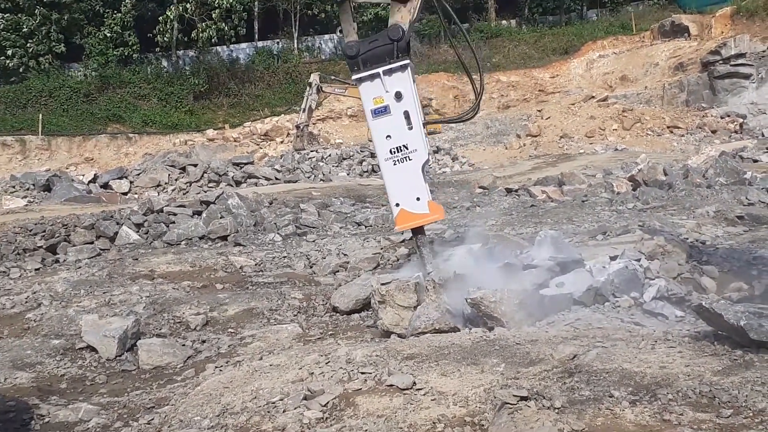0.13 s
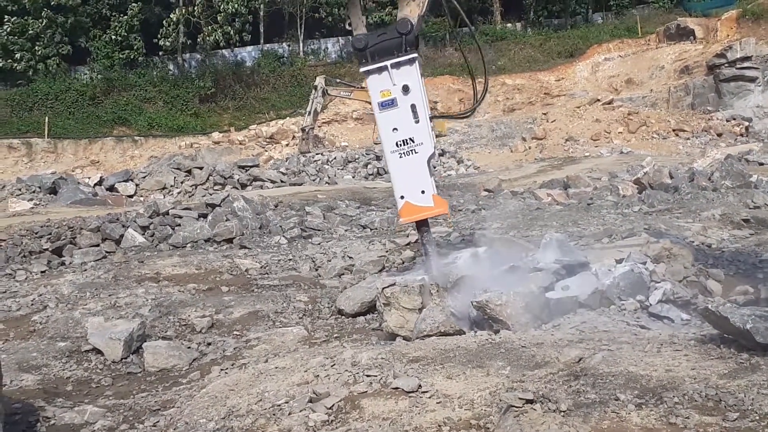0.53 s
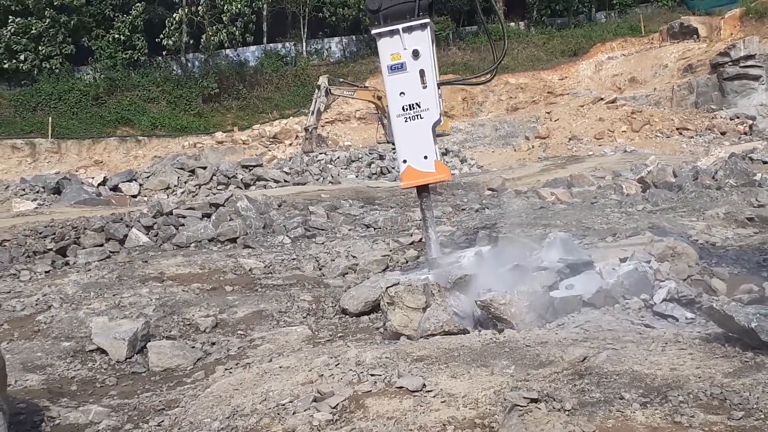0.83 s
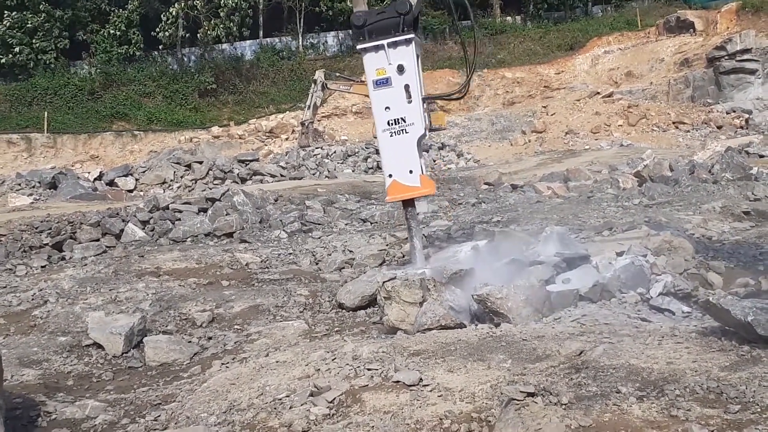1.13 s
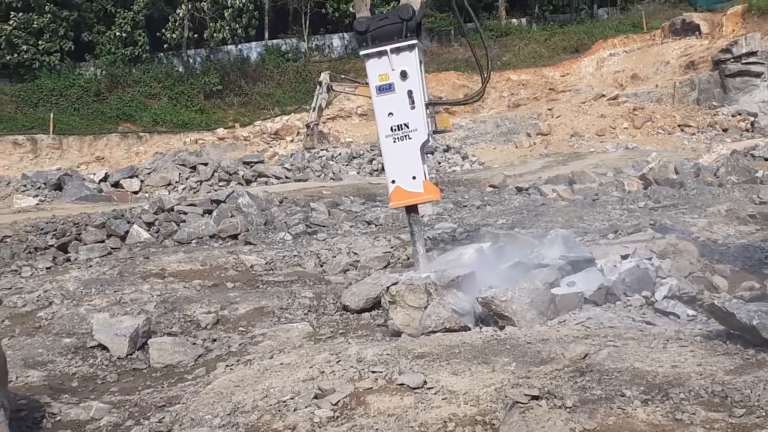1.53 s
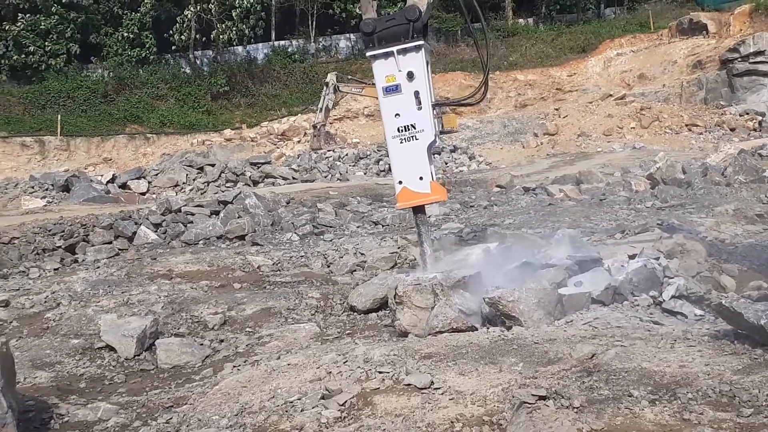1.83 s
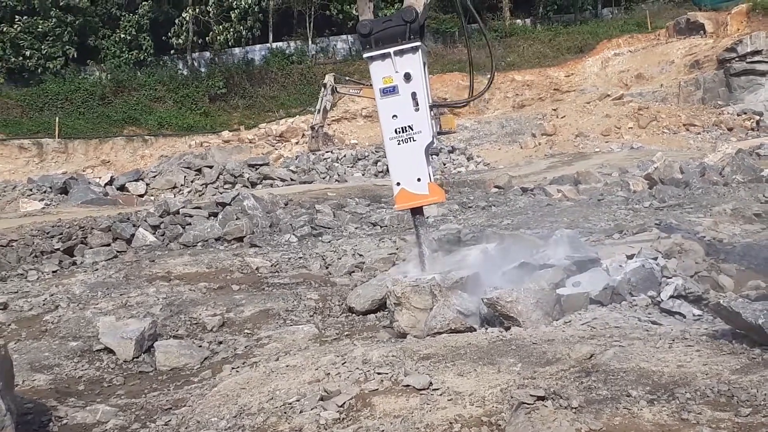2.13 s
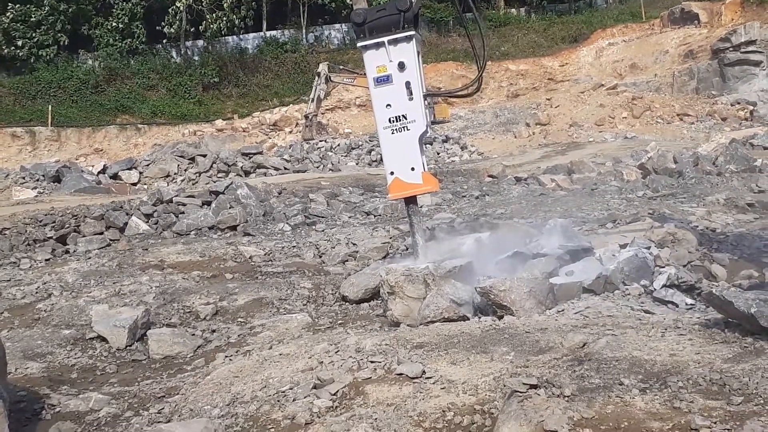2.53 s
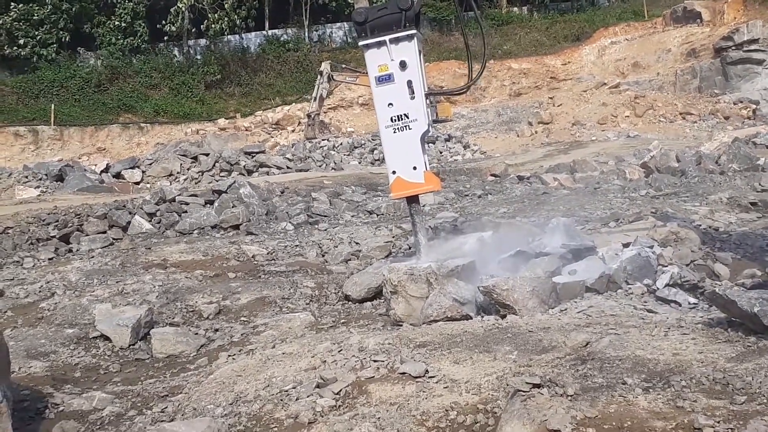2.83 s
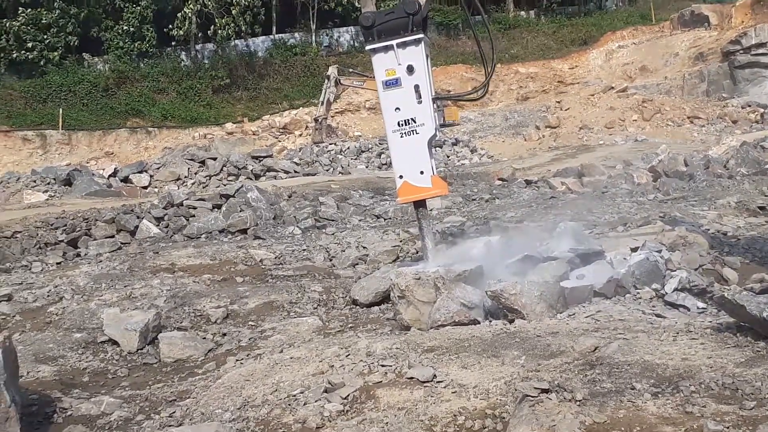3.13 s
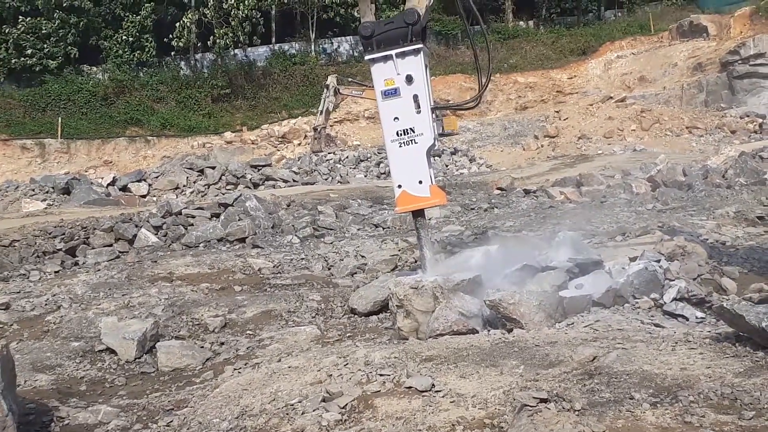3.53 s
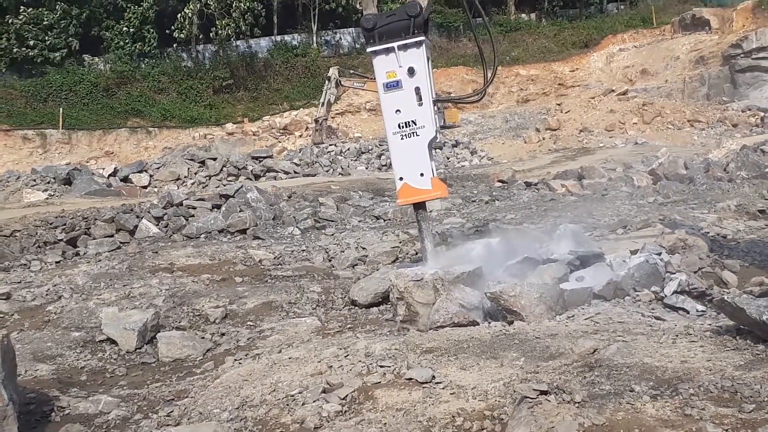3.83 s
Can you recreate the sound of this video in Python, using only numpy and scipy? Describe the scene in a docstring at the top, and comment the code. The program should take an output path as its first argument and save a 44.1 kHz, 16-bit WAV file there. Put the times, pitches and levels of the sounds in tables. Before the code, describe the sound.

Loud steel-on-rock hammering by a hydraulic breaker outdoors, first three spaced clanging blows, then rubble shifting and faint hisses, then about seven or eight hard blows a second, over a quiet low engine, heard in fairly narrow stereo.

```python
"""A hydraulic breaker hammers rock in an open quarry, heard on a stereo microphone: three loose blows,
a pause while the chisel is set down again, then about 7.5 blows a second. Shaped noise makes the crash, the crack,
the loose rock, the valve's spit and the oil's hiss; decaying modes make the ring of chisel and housing.
A low echo follows after 54 ms, as from a face some nine metres off, with a dull scatter from the rubble.
Underneath, the excavator's diesel drones: wavering sines over a noise rumble."""
import sys
import numpy as np
from scipy import signal
from scipy.fft import rfft, irfft
from scipy.io import wavfile

SR = 44100
rng = np.random.default_rng(int(sys.argv[2]) if len(sys.argv) > 2 else 0)


def generate_wav(signal):
    """Clip the signal to [-1, 1] and save it as 16-bit WAV at the path in sys.argv[1]."""
    frames = np.transpose(np.atleast_2d(signal))
    scaled = np.clip(frames, -1, 1) * 32767
    pcm = np.round(scaled).astype(np.int16)
    wavfile.write(sys.argv[1], SR, pcm)


N = 176400
T = np.arange(int(.9 * SR)) / SR  # time axis of one event, in seconds

# Stereo image at the microphone. Each row: pitch in Hz, side minus mid in dB, left minus right in dB.
STEREO_IMAGE = [(100, -24, -1.5), (423, -22.5, -0.5), (800, -12, -0.5), (1400, -10, -.4),
                (2860, -8.5, -2.5), (5400, -10, -3), (9300, -6.5, -1.5), (14000, -8.5, 3.5)]

# Colour of the diesel's rumble. Each row: pitch in Hz, relative level in dB per Hz.
RUMBLE_COLOUR = [(25, -41), (50, -15), (80, -12), (120, -5.5), (165, 2.5), (240, -1.5), (380, -10.5),
                 (600, -9.5), (850, -16.5), (2000, -26.5), (5000, -28), (10500, -38.5), (15000, -44)]
# Engine orders, before their waver. Each row: pitch in Hz, rms level in dB.
ENGINE_ORDERS = [(82, -46), (122, -50.5), (164, -43), (243, -47)]
RUMBLE_DB, ORDER_WAVER_DB = -39, 3

# Piston blows. Each row: start in seconds, then crash, boom, treble, crack, clang, overtone and bending ring
# levels in dB (added to the levels below), ring length as a factor, crash hold in seconds.
BLOWS = [(0.002, -6.5, -15, 1.5, 0, 11, 5.5, -16, 1.8, 0.046),
         (0.212, -2.5, -16.5, -1, -3, 4, -2, -14, 3.6, 0.027),
         (0.405, -6, -15, -5.5, 0.5, -18, -12.5, -22, 2.04, 0.06),
         (1.555, -2, -6, 0.5, -1, 13, 6, -16, 0.96, 0.026),
         (1.6909, -1, -6.5, 1.5, 1, 0, 2.5, -14.5, 1.23, 0.0093),
         (1.823, -2.5, -4, 3, -5, -1.5, -1.5, -8, 1.45, 0.011),
         (1.9558, -3, -4, 2.5, -18, -3.5, 3.5, -12.5, 1.55, 0.028),
         (2.09, -2.5, -5.5, 3.5, -21, -3, 2.5, -11, 1.85, 0.031),
         (2.224, -2, -5, 3.5, -17, -6, 2, -3.5, 1.6, 0.046),
         (2.359, 0.5, -5, -0.5, -13, -1, 6.5, -7.5, 1.53, 0.017),
         (2.489, -1, -3.5, 0, -8, -10, 5, -5.5, 1.38, 0.025),
         (2.62, -1.5, -5.5, -1, -12, -2, 9, -7.5, 1.07, 0.0085),
         (2.753, -1.5, -5, 1, -0.5, -6, 10, -12, 0.89, 0.01),
         (2.888, 0, -3, -1.5, 3, -16, 3.5, -2.5, 0.74, 0.015),
         (3.023, -0.5, -4.5, 0.5, 8, -4, 5, -9, 1.07, 0.016),
         (3.158, 0, -4, 0.5, 6.5, -18, 5.5, -5.5, 0.86, 0.016),
         (3.2886, -1, -4, 1, 7.5, -10, 6, -6, 1.07, 0.025),
         (3.422, 0, -4, 0.5, -15, -9, 6, -5.5, 1.2, 0.018),
         (3.5535, -2.5, -7.5, 3.5, -14, -17, 3.5, -5, 1.34, 0.031),
         (3.6873, -0.5, -6, 1.5, 5.5, -2, 4.5, -3, 1.24, 0.022),
         (3.8231, -1.5, -8, 2, 4, -1.5, -2, -6, 1.5, 0.016),
         (3.967, 1, -3.5, -2.5, 1, -5, -1, -6, 1.06, 0.018)]

# Colour of the crash of steel on rock. Each row: pitch in Hz, relative level in dB per Hz.
CRASH_COLOUR = [(30, -46), (60, -16), (125, -12.5), (250, 8), (420, 0.5), (570, 4.5), (760, -4), (1080, -2),
                (1340, -14), (1650, -5), (2200, -7), (2650, -8.5), (3600, -12), (4400, -3), (5000, -10.5),
                (5600, -10), (6100, -12), (6850, -4), (7500, -18.5), (9500, -18.5), (12000, -23),
                (15500, -36)]
# Decay of the crash by band. Each row: band centre in Hz, t60 in seconds.
CRASH_DECAY = [(100, 0.36), (300, 0.18), (1000, 0.17), (2500, .17), (6000, 0.15), (14000, 0.34)]
CRASH_DB = -14
REPEAT_SHARE = 0.39  # share of the crash's power that is the same noise at every blow
SNAP_DB, SNAP_T60_S = 0, 0.09
TAIL_DB, TAIL_T60_S = -5.5, 0.46
BASS_LAG_CYCLES = 0.38  # rise time of each band, in cycles of its centre
PATCHY_DB, PATCH_WIDTH_HZ, PATCHY_FROM_HZ = 4, 70, 2000
TOP_HZ = 15700  # upper limit of the recorder

# Colour of the crack, the loose rock and one hiss among it.
# Each row: pitch in Hz, relative level in dB per Hz.
ROCK_COLOUR = [(30, -36), (140, 9), (400, 3.5), (560, 10), (800, 1), (1400, -1), (2200, -6), (3300, -8),
               (5000, -8), (8000, -16), (15000, -31)]
CRACK_HZ, CRACK_WIDTH, CRACK_DB = 1098, 0.053, -24.5  # width is a share of the pitch
CRACK_HOLD_S, CRACK_T60_S = 0.0086, 0.098

# Lengthwise fundamental of the chisel, a close pair.
# Each row: pitch in Hz, level in dB, t60 in seconds before the blow's ring length factor.
CLANG_MODES = [(2214, -23.5, 0.18), (2230, -24, 0.11)]
# Lengthwise overtones of the chisel. Each entry: pitch in Hz.
OVERTONE_HZ = [4316, 4345, 6411, 6420, 8591, 9477, 10772, 10806, 12752, 12764, 14567]
# The same overtones. Each row: level in dB before tilt, t60 in seconds before the ring length factor.
OVERTONE_RING = [(-31, 0.17), (-23.5, 0.17), (-31.5, 0.19), (-34, 0.54), (-33, 0.29), (-34.5, 0.24),
                 (-30, 0.21), (-34, 0.34), (-33, 0.18), (-43, 0.47), (-37.5, 0.23)]
# Bending modes of the chisel. Each entry: pitch in Hz.
BENDING_HZ = [1926, 2992, 3180, 4193, 4555, 4730, 5270, 5448, 5560, 6760, 6908, 8087, 12200, 13324, 13512]
# The same bending modes. Each row: level in dB, t60 in seconds before the ring length factor.
BENDING_RING = [(-17.5, 0.13), (-12, 0.06), (-22, 0.22), (-11, 0.14), (-27, 0.29), (-26.5, 0.41),
                (-14, 0.17), (-13, 0.15), (-15, 0.13), (-26.5, 0.16), (-33.5, 0.68), (-22.5, 0.22),
                (-35, 0.75), (-35, 0.23), (-38, 0.17)]
# Tilt of the overtones, darker on loose rock. Each row: time in seconds, tilt in dB per octave.
OVERTONE_TILT = [(0, -4.5), (.21, -3), (.41, -7), (1.555, 2.5), (1.69, -5), (2.2, -3), (2.75, -0.5),
                 (3.3, 0.5), (3.97, 4)]
RING_RISE_S, CHOKE_T60_S = 0.0021, 0.15
RING_SCATTER_DB = 2
OVERTONE_DETUNE, BENDING_DETUNE = .0007, .0025  # random spread as a share of the pitch

# Modes of the breaker's housing. Each row: pitch in Hz, level in dB, t60 in seconds.
HOUSING_MODES = [(150, -20, 0.4), (244.6, -14.5, 0.23), (515.5, -18, 0.14), (641, -23, 0.2),
                 (970, -34, 0.055), (1056, -30, 0.097), (1134, -12, 0.062)]
BOOM_RISE_S, BOOM_SCATTER_DB, BOOM_DETUNE = 0.0035, 1.5, .01

THUMP_HZ, THUMP_DB, THUMP_AT_S, THUMP_WIDTH_S = 123, -12.5, 0.01232, 0.0088

# Side plates of the housing. Each row: pitch in Hz, level in dB, t60 in seconds before PLATE_LENGTH.
PLATE_MODES = [(241.3, -3.5, 0.15), (349.2, 0, .17), (551, 5.5, 0.12)]
# Level of the plates' ring. Each row: time in seconds, level in dB.
PLATE_LEVEL = [(0, -0.5), (.3, -4.5), (1.555, -2), (1.69, 2), (2.09, 0.5), (2.36, -5.5), (2.62, -1.5),
               (3.1, -1), (3.55, -2), (3.97, -8)]
PLATE_SWELL_S, PLATE_LENGTH = 0.034, 0.97

ECHO_S, ECHO_DB, ECHO_HZ = .054, -6.5, 207  # delay, level, low-pass corner
SCATTER_DB, SCATTER_T60_S, SCATTER_DULL_HZ = -17.5, 0.66, 4000

# Loose rock knocking and sliding, and one burst of oil hiss at 0.742 s. Each row: start in seconds,
# level in dB, treble in dB, hold in seconds, decay t60 in seconds, band centre in Hz, band boost or cut in dB.
KNOCKS_AND_HISS = [(0.066, -5.5, 5.5, 0.012, 0.33, 4700, 7), (0.405, -8, 8.5, 0.022, 0.13, 1640, 16),
                   (0.541, -26, 5, 0.0034, 0.072, 1720, 27), (0.623, -30.5, 8, 0.015, 0.33, 600, 3),
                   (0.644, -20.5, -33, 0.0074, 0.065, 1530, 17), (0.742, -34, 9.5, 0.014, 0.23, 1700, -3),
                   (1.080, -18.5, 0.5, 0.014, 0.27, 1020, 5.5), (1.127, -26, 1, 0.034, .25, 2270, 14),
                   (1.167, -29, 12, 0.0043, 0.079, 7400, 10), (1.202, -8, -4, .015, 0.17, 2150, 10),
                   (1.214, -6, -7.5, 0.023, 0.13, 800, 11.5), (1.223, -6.5, -7, 0.018, 0.12, 554, 15),
                   (1.263, -16, 2, 0.031, 0.18, 1090, 7), (1.322, -15, -2, 0.01, 0.086, 525, 9.5)]
BURST_DB, BURST_RISE_S, BURST_BAND_WIDTH = -12.5, 0.0023, 0.064

# Colour of the valve's spit and of the oil. Each row: pitch in Hz, relative level in dB per Hz.
VALVE_COLOUR = [(100, -54), (500, 6), (1500, -1), (3000, -3.5), (4800, 5.5), (7500, -7.5), (10500, 1),
                (13000, -8), (16000, -14.5)]
VALVE_LEAD_S, VALVE_DB = .0245, -23.5
VALVE_RISE_S, VALVE_HOLD_S, VALVE_T60_S = 0.0028, 0.0081, 0.063

# Oil hissing through the control valve in the pause.
# Each row: start in seconds, level in dB, decay t60 in seconds.
HISSES = [(0.742, -47.5, .35), (1.418, -49, 0.14)]
HISS_HZ, HISS_WIDTH, HISS_RISE_S = 12200, .2, 0.0052

CEILING = .95  # full-scale level that the recorder's peaks approach


def undb(db):
    """Decibels to an amplitude factor."""
    return 10 ** (np.asarray(db) / 20)


def at(hz, table, axis=1):
    """A column of a table, read on a log-frequency axis."""
    table = np.array(table, float)
    return np.interp(np.log(np.maximum(hz, 1)), np.log(table[:, 0]), table[:, axis])


def at_time(seconds, table):
    """The level column of a time table, read between its rows."""
    return np.interp(seconds, *np.transpose(table))


def bins(size):
    """Pitches in Hz of the spectrum of a sound."""
    return np.arange(size // 2 + 1) * SR / size


def add(out, start, sound):
    """Mix a sound in from a given time; one that would start before zero is left out."""
    i = int(start * SR)
    if 0 <= i < N:
        out[:, i:i + sound.shape[1]] += sound[:, :N - i]


def spread(hz, mid, side):
    """Left and right from mid and side, with width and balance set by pitch."""
    side = side * undb(at(hz, STEREO_IMAGE, axis=1))
    pan = undb(at(hz, STEREO_IMAGE, axis=2) / 2)
    return np.array([(mid + side) * pan, (mid - side) / pan])


def noise(colour, size):
    """Stereo noise of a given colour, rms 1."""
    mid, side = rfft(rng.standard_normal((2, size)))
    hz = bins(size)
    x = irfft(spread(hz, mid, side) * undb(at(hz, colour)), size)
    return x / x.std()


def lowpass(x, hz, order=2):
    """Butterworth low-pass."""
    return signal.sosfilt(signal.butter(order, min(hz, SR / 2 - 1), fs=SR, output="sos"), x)


def brighten(x, db, corner_hz=2200):
    """Treble shelf."""
    low = lowpass(x, corner_hz, order=1)
    return low + undb(db) * (x - low)


def resonate(x, hz, width):
    """One resonance; width is a share of its pitch."""
    return signal.lfilter(*signal.iirpeak(min(hz, SR * .45), 1 / width, fs=SR), x)


def rise(time_s):
    """Exponential onset with a given time constant."""
    return 1 - np.exp(-T / time_s)


def fade(hold, t60):
    """Hold, then an exponential decay of 60 dB in t60 seconds."""
    return 1000. ** (-np.maximum(T - hold, 0) / max(t60, 1e-3))


def ring(modes, rise_s, length, scatter_db, detune):
    """Modes struck once, each decaying; every strike shares its force among them a little differently."""
    out = 0
    chances = rng.standard_normal((len(modes), 4))
    for (hz, db, t60), (size, off, mid_turn, side_turn) in zip(modes, chances):
        turning = 2j * np.pi * hz * (1 + detune * off)
        damping = np.log(1000) / (t60 * length)
        wave = signal.lfilter([1], [1, -np.exp((turning - damping) / SR)], T == 0)
        ears = spread(hz, np.exp(1j * np.pi * mid_turn), np.exp(1j * np.pi * side_turn))
        out = out + (ears[:, None] * wave).imag * undb(db + scatter_db * size)
    return out * rise(rise_s)


def walk(count):
    """Slow random wander around 0 with count turning points in all; spread near 1."""
    return np.interp(np.linspace(0, count - 1, N), np.arange(count), rng.standard_normal(count))


def engine(wander=.008):
    """The diesel's orders share one wandering speed, each wavering in level, over the rumble."""
    seconds_run = np.cumsum(1 + wander * walk(count=30)) / SR
    hum = 0
    for hz, db in ENGINE_ORDERS:
        level = np.sqrt(2) * undb(db + ORDER_WAVER_DB * walk(count=60))  # root 2 turns rms to peak
        hum = hum + level * np.sin(2 * np.pi * (hz * seconds_run + rng.random()))
    return hum + undb(RUMBLE_DB) * noise(RUMBLE_COLOUR, N)


def patches(hz):
    """Every blow favours other resonances of the dense steel spectrum, less so in the bass."""
    grid = np.arange(0, SR / 2, PATCH_WIDTH_HZ)
    bumps = np.interp(hz, grid, rng.standard_normal(len(grid)))
    gain = undb(PATCHY_DB * bumps * np.minimum(hz / PATCHY_FROM_HZ, 1))
    return gain / gain[hz < TOP_HZ].mean()


def crash(same, treble_db, hold):
    """Steel on rock: dense noise, partly the same each time, rising and decaying band by band."""
    patchy = patches(bins(len(T)))
    fresh = noise(CRASH_COLOUR, len(T))
    mixed = np.sqrt(REPEAT_SHARE) * same + np.sqrt(1 - REPEAT_SHARE) * fresh
    dense = patchy * rfft(brighten(mixed, treble_db))
    snap_and_tail = np.hypot(undb(SNAP_DB) * fade(0, SNAP_T60_S), undb(TAIL_DB) * fade(0, TAIL_T60_S))
    centres = [hz for hz, _ in CRASH_DECAY]
    out = 0
    for (centre, t60), one in zip(CRASH_DECAY, np.eye(len(centres))):
        band = at(bins(len(T)), list(zip(centres, one)))  # overlapping bands that sum to 1
        envelope = rise(BASS_LAG_CYCLES / centre) * np.hypot(fade(hold, t60), snap_and_tail)
        out = out + irfft(dense * band, len(T)) * envelope
    return out


def crack():
    """The rock cracks: noise through one narrow resonance, held briefly, then decaying."""
    x = resonate(noise(ROCK_COLOUR, len(T)), CRACK_HZ, CRACK_WIDTH)
    return x / x.std() * fade(CRACK_HOLD_S, CRACK_T60_S)


def chisel(clang_db, overtone_db, bend_db, length, tilt_db):
    """The steel bar rings lengthwise and in bending, longer when it hangs loose."""
    middle_hz = np.median(OVERTONE_HZ)
    overtones = [(hz, db + tilt_db * np.log2(hz / middle_hz), t60)
                 for hz, (db, t60) in zip(OVERTONE_HZ, OVERTONE_RING)]
    bending = np.column_stack([BENDING_HZ, BENDING_RING])
    groups = [(CLANG_MODES, clang_db, OVERTONE_DETUNE),
              (overtones, overtone_db, OVERTONE_DETUNE),
              (bending, bend_db, BENDING_DETUNE)]
    return sum(undb(db) * ring(modes, RING_RISE_S, length, RING_SCATTER_DB, detune)
               for modes, db, detune in groups)


def housing():
    """The breaker's housing booms in its own modes, set off by the blow."""
    return ring(HOUSING_MODES, BOOM_RISE_S, 1, BOOM_SCATTER_DB, BOOM_DETUNE)


def breaker():
    """Each blow crashes on the rock, cracks it, rings the chisel and booms in the housing."""
    out = np.zeros((2, N))
    same = noise(CRASH_COLOUR, len(T))
    gaps = np.diff([row[0] for row in BLOWS], append=np.inf)
    for blow, gap in zip(BLOWS, gaps):
        start, crash_db, boom_db, treble_db, crack_db, clang_db, overtone_db, bend_db, length, hold = blow
        add(out, start, undb(CRASH_DB + crash_db) * crash(same, treble_db, hold))
        add(out, start, undb(CRACK_DB + crack_db) * crack())
        steel = chisel(clang_db, overtone_db, bend_db, length, at_time(start, OVERTONE_TILT))
        add(out, start, steel * fade(gap - VALVE_LEAD_S, CHOKE_T60_S))  # the next stroke damps the ring
        add(out, start, undb(boom_db) * housing())
    return out


def ground():
    """The ground thumps under each blow: a low sine in a short bell-shaped burst."""
    out = np.zeros((2, N))
    late = T - THUMP_AT_S
    thump = np.sin(2 * np.pi * THUMP_HZ * late) * np.exp(-(late / THUMP_WIDTH_S) ** 2)
    for start, _, boom_db, *_ in BLOWS:
        add(out, start, undb(THUMP_DB + boom_db) * np.array([thump, thump]))
    return out


def side_plates():
    """The housing's plates build up after each blow and die away as modes with a double onset."""
    out = np.zeros((2, N))
    for start, *_ in BLOWS:
        plates = ring(PLATE_MODES, PLATE_SWELL_S, PLATE_LENGTH, BOOM_SCATTER_DB, BOOM_DETUNE)
        add(out, start, undb(at_time(start, PLATE_LEVEL)) * plates * rise(PLATE_SWELL_S))
    return out


def quarry(x):
    """One low echo from the rock face and a dull scatter from the rubble, as a decaying noise response."""
    scatter = lowpass(rng.standard_normal((2, len(T))), SCATTER_DULL_HZ)
    mid, side = rfft(scatter * fade(0, SCATTER_T60_S) * rise(ECHO_S))
    scatter = irfft(spread(bins(len(T)), mid, side), len(T))
    scatter = scatter / np.sqrt(np.sum(scatter ** 2))
    out = undb(SCATTER_DB) * signal.fftconvolve(x, scatter, axes=1)[:, :N]
    add(out, ECHO_S, undb(ECHO_DB) * lowpass(x, ECHO_HZ))
    return out


def loose_rock_and_hiss():
    """Rock knocks and slides, and oil hisses once: noise bursts, each with one band boosted or cut."""
    out = np.zeros((2, N))
    for start, db, treble_db, hold, t60, hz, band_db in KNOCKS_AND_HISS:
        grain = noise(ROCK_COLOUR, len(T))
        grain = grain + (undb(band_db) - 1) * resonate(grain, hz, BURST_BAND_WIDTH)
        burst = brighten(grain / grain.std(), treble_db) * rise(BURST_RISE_S) * fade(hold, t60)
        add(out, start, undb(BURST_DB + db) * burst)
    return out


def valve():
    """A spit of noise before each stroke, following the crash's level; the first falls before zero."""
    out = np.zeros((2, N))
    for start, crash_db, *_ in BLOWS:
        spit = noise(VALVE_COLOUR, len(T)) * rise(VALVE_RISE_S) * fade(VALVE_HOLD_S, VALVE_T60_S)
        add(out, start - VALVE_LEAD_S, undb(VALVE_DB + crash_db) * spit)
    return out


def oil():
    """Thin hisses as the boom is moved: noise through a high resonance."""
    out = np.zeros((2, N))
    for start, db, t60 in HISSES:
        hiss = resonate(noise(VALVE_COLOUR, len(T)), HISS_HZ, HISS_WIDTH)
        add(out, start, undb(db) * hiss / hiss.std() * rise(HISS_RISE_S) * fade(0, t60))
    return out


def scene():
    """The work and its return from the quarry, over the diesel."""
    work = breaker() + ground() + side_plates() + loose_rock_and_hiss() + valve() + oil()
    return engine() + work + quarry(work)


def record(dry):
    """The recorder rounds the loudest peaks and cuts the top."""
    rounded = dry / (1 + (dry / CEILING) ** 4) ** .25
    return signal.sosfilt(signal.ellip(8, .2, 80, TOP_HZ, fs=SR, output="sos"), rounded)


dry = scene()
out = record(dry)
generate_wav(out)
```